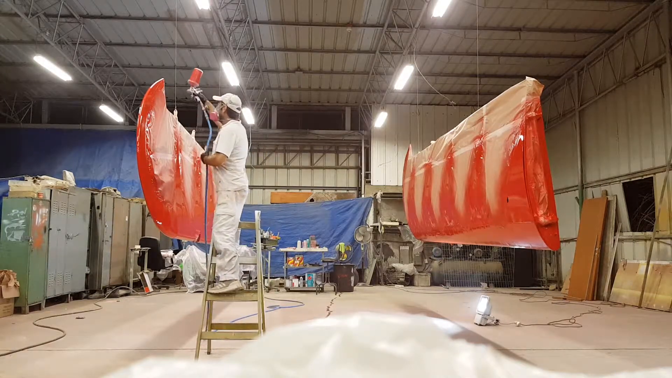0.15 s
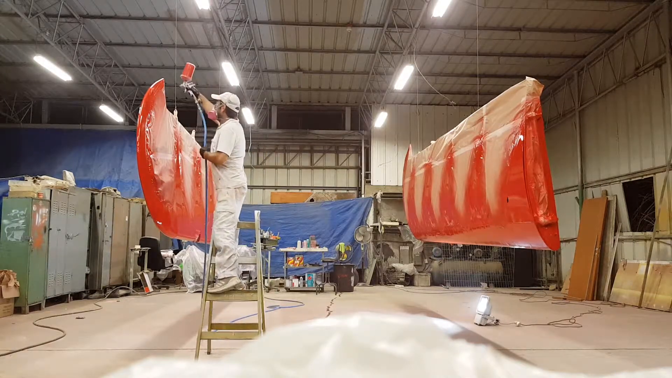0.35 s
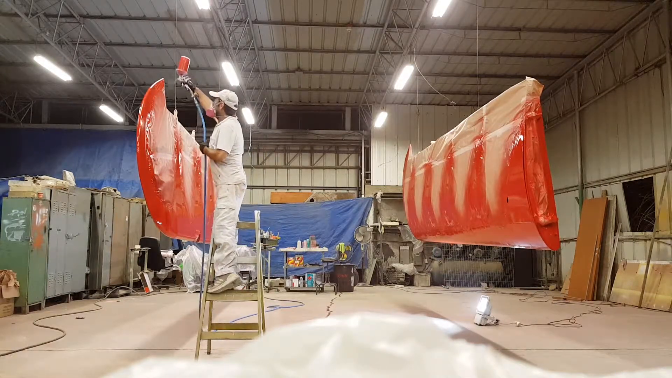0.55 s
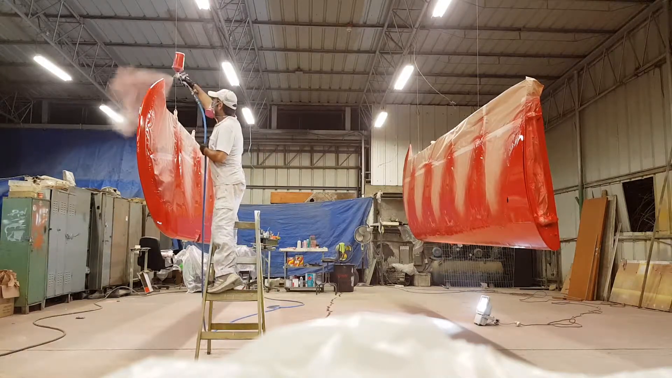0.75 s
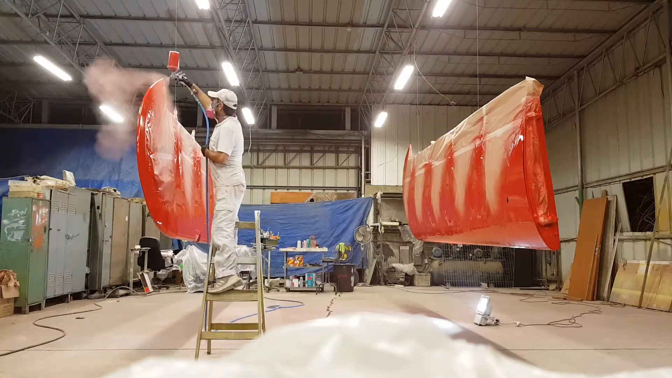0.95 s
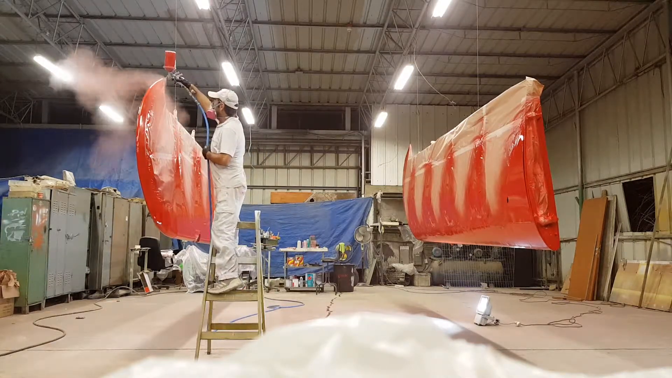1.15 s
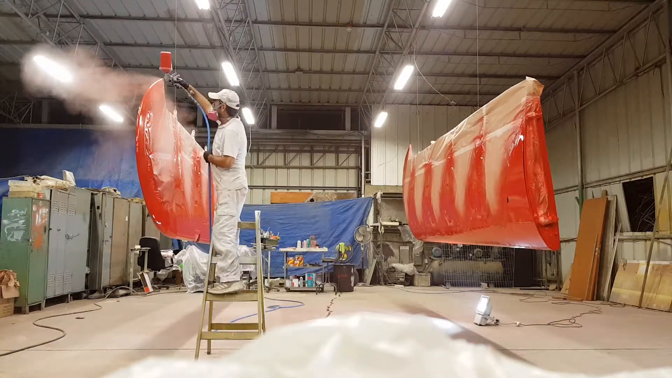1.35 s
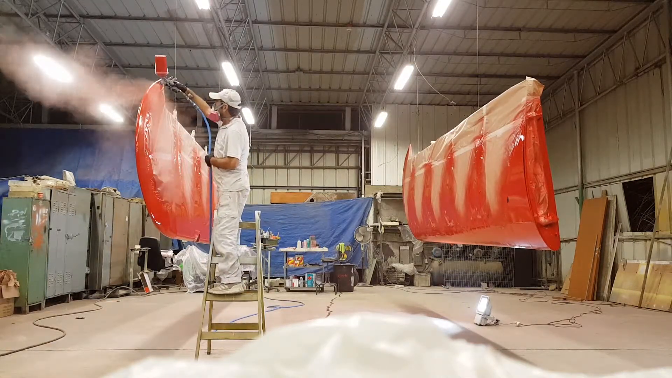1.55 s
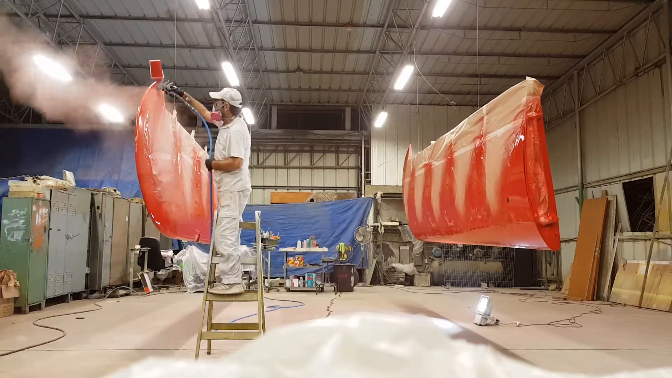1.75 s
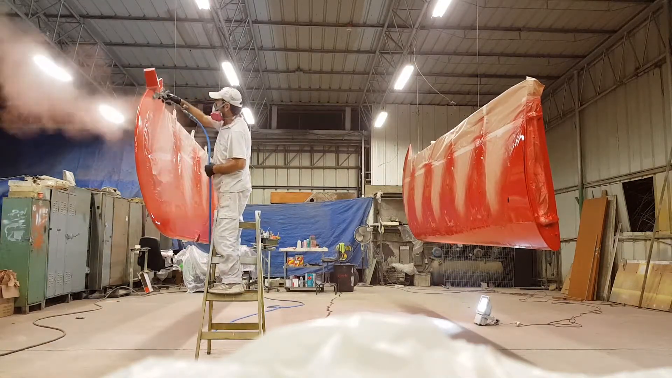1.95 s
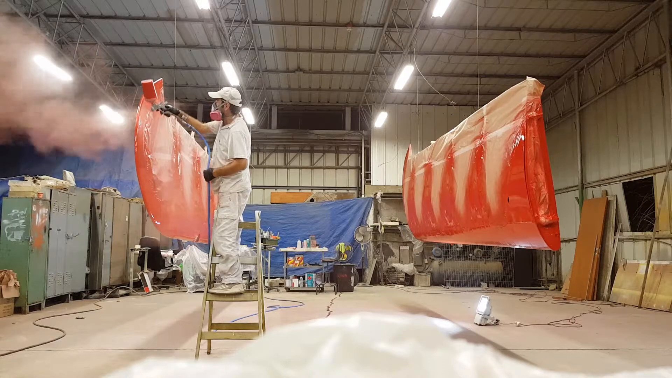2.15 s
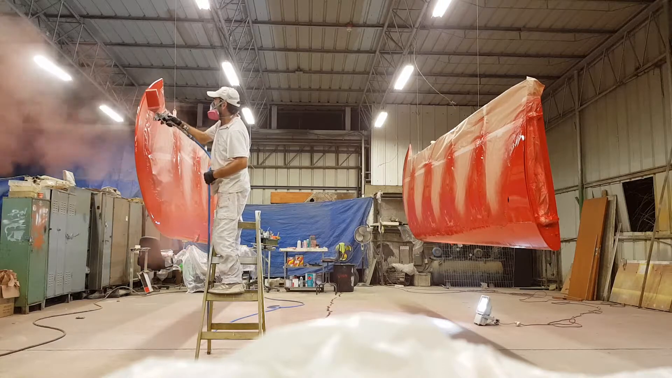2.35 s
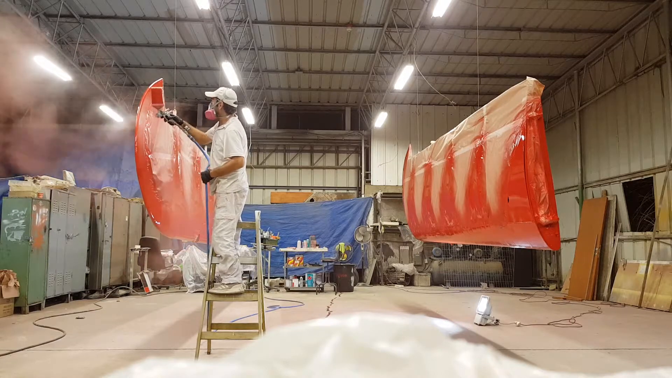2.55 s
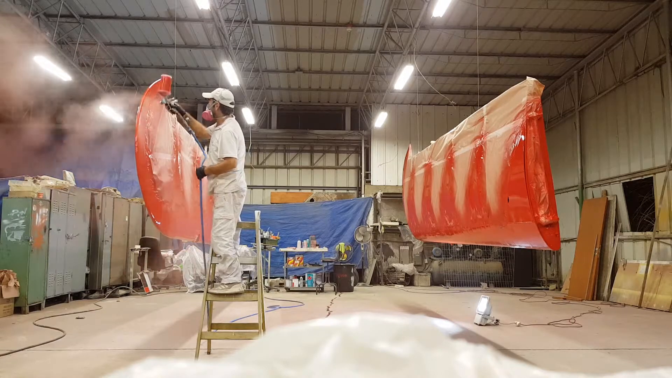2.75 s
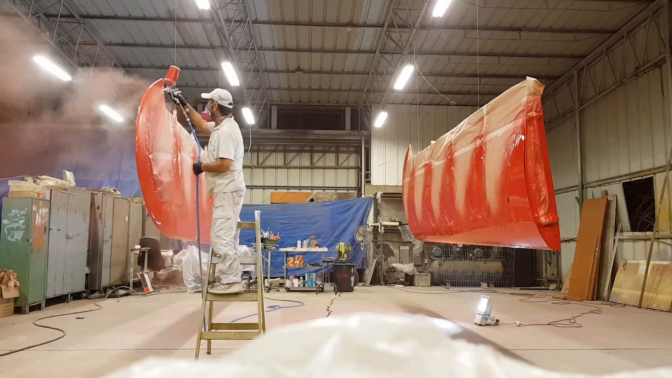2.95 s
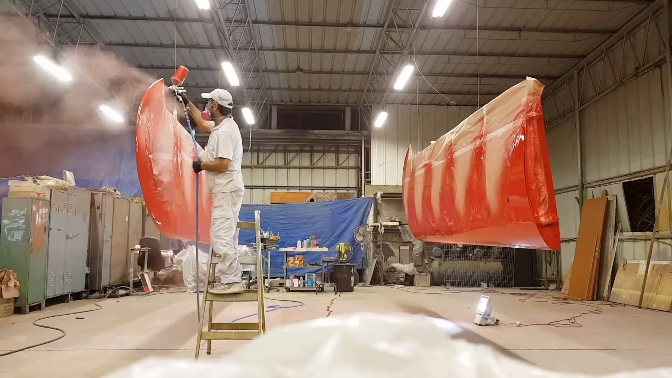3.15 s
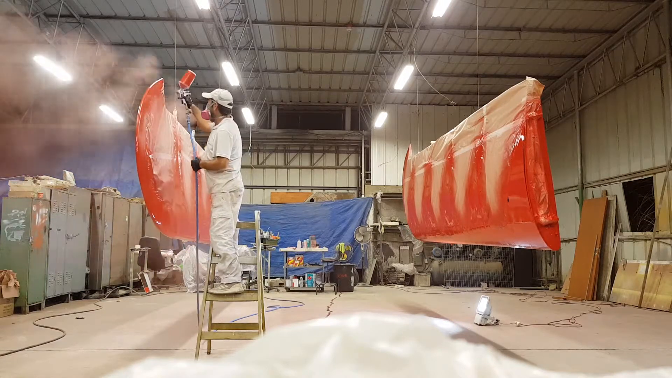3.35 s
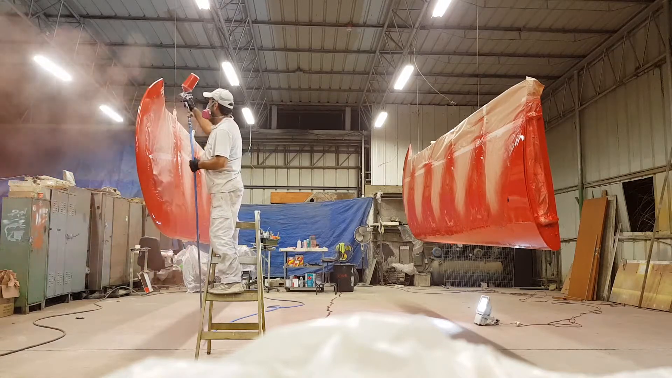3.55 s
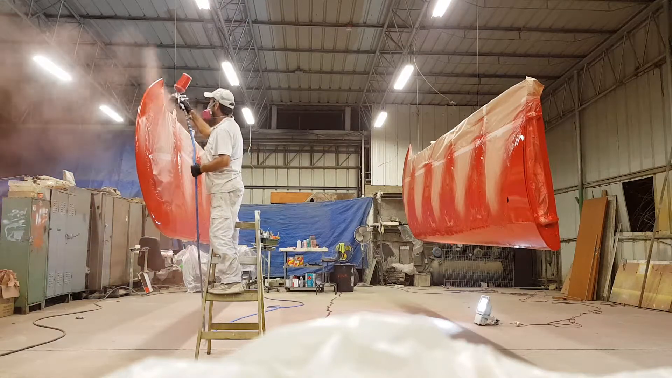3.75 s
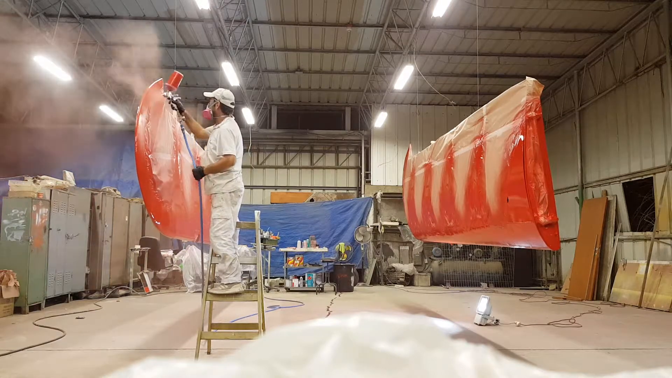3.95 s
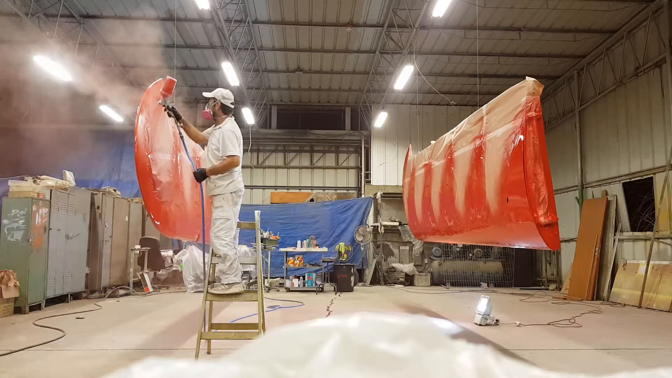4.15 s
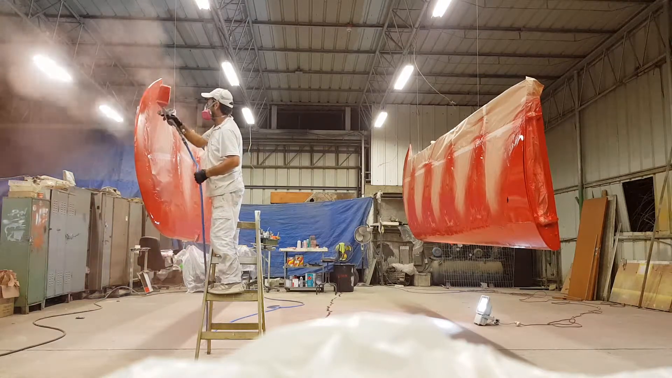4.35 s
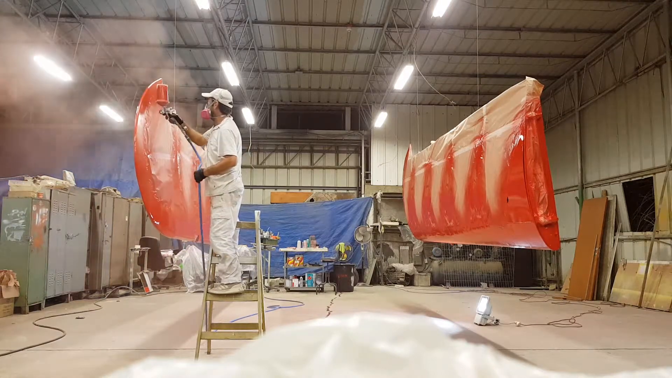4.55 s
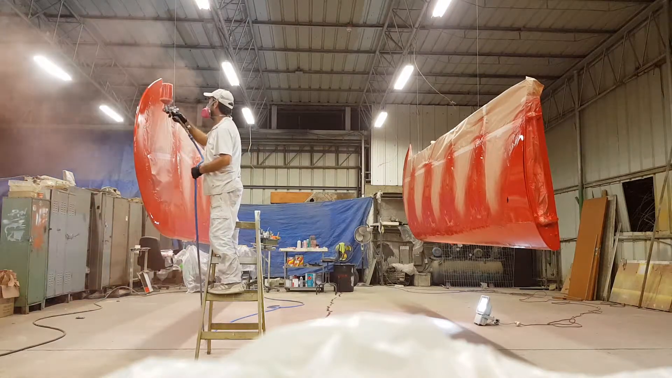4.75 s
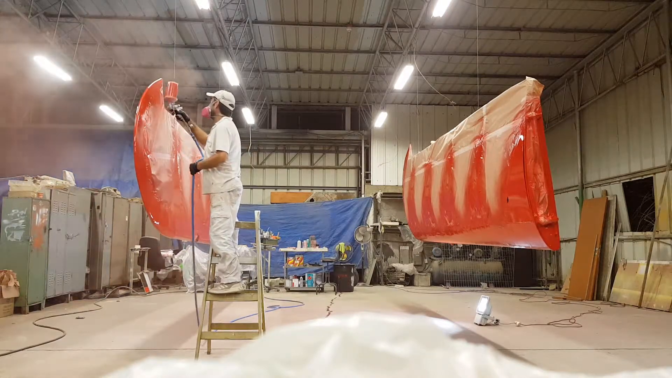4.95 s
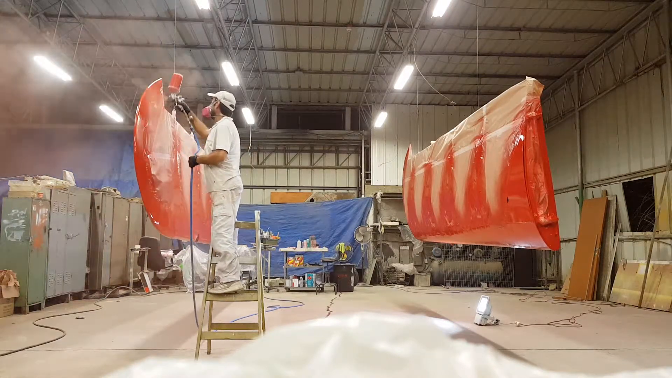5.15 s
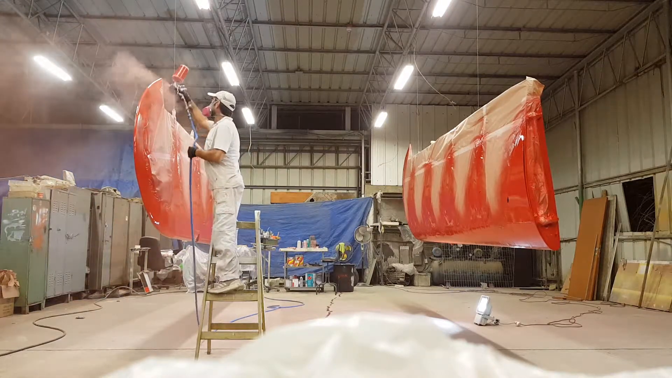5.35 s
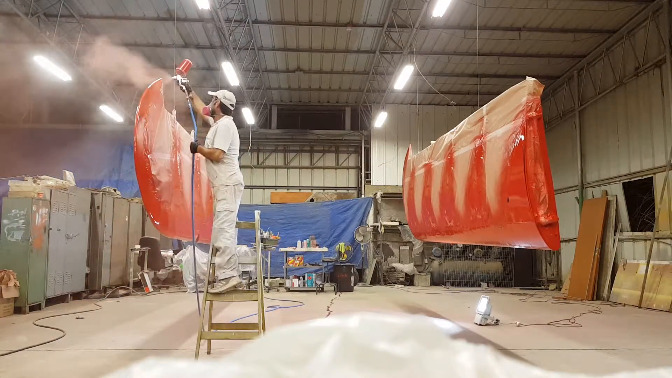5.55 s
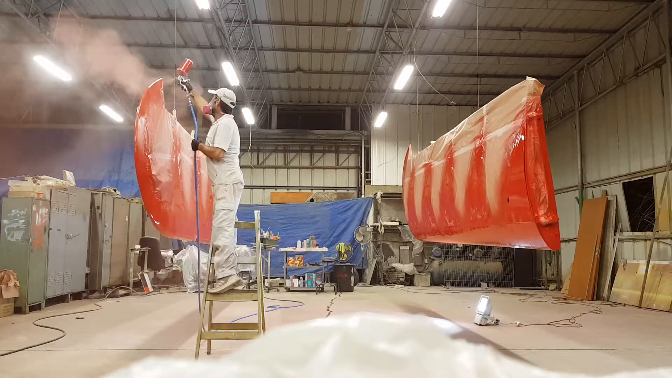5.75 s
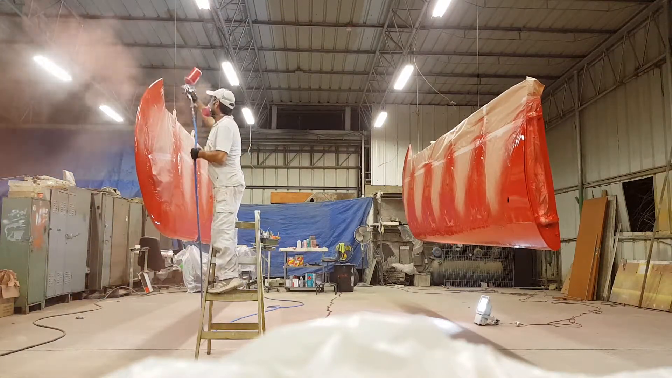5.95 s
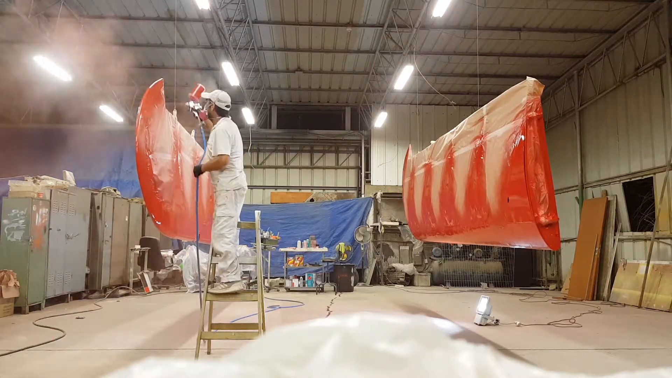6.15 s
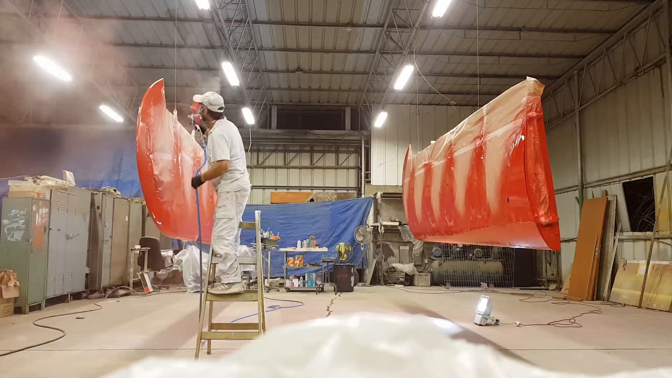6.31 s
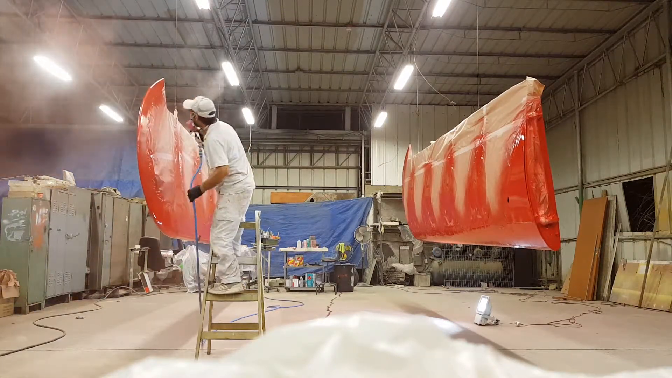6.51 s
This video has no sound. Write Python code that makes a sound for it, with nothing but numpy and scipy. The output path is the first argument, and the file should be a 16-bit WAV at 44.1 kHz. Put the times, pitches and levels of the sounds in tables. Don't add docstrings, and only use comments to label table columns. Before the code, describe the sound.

Inside a large hangar, a faint motor hum and soft ventilation wash run throughout. A trigger clacks, a thin bright air hiss starts, and paint dulls it into a fuller spray with a low roar in a hollow panel. Four passes alternate with sharper air-only spells. Soft ladder knocks sit underneath; release leaves a short hall ring. Stereo microphone some metres away.

```python
import sys
import numpy as np
from scipy import signal
from scipy.fft import rfft, irfft, next_fast_len
from scipy.io import wavfile
from scipy.ndimage import uniform_filter1d

SR = 44100
rng = np.random.default_rng(int(sys.argv[2]) if len(sys.argv) > 2 else 0)


def linear_from_db(decibels):
    return 10 ** (np.asarray(decibels, float) / 20)


def pcm_store(signal):
    levels = np.round(np.clip(np.atleast_2d(signal), -1, 1) * 32767)
    wavfile.write(sys.argv[1], SR, levels.astype(np.int16).T)


N = 294588
SIZE, HOP = 512, 128
HZ = np.fft.rfftfreq(SIZE, 1 / SR)[:, None]
T = np.arange(N // HOP + 5) * HOP / SR


def gun():
    power = jet() * linear_from_db(5.5)
    port_lag_s, likeness = 0.00015, 0.85
    lag = np.exp(-2j * np.pi * HZ * port_lag_s)
    direct = noise(power, likeness, lag) * valve(np.arange(N) / SR)
    return early(direct) + hall(power * valve(T - 0.012) ** 2)


def valve(t):
    open_s, shut_s = 0.538, 5.858
    opening_s, closing_s = 0.015, 0.0089
    opened = np.clip((t - open_s) / opening_s, 0, 1) ** 2
    return opened * np.exp(-np.maximum(t - shut_s, 0) / closing_s)


# frequency [Hz], density [dB per Hz].
FIZZ = [(2500, -32), (4000, -9), (6000, -11), (7500, -5.5), (10000, 0.5), (12000, 2), (13500, 3),
        (14900, 0.5)]
# frequency [Hz], density [dB per Hz].
BODY = [(300, -37), (1000, -25), (2000, 0), (2800, 1.5), (3500, 0.5), (4300, -4), (6000, -3.5), (9000, 1.5),
        (14900, -4)]
# frequency [Hz], density [dB per Hz].
ROAR = [(150, 4), (400, -19), (800, 3.5), (1150, 4.5), (1450, 5.5), (2200, -0.5), (3500, -17), (6000, -40)]
# centre [Hz], width [Hz], gain [dB].
RESONANCES = [(4730, 310, 5), (6000, 1080, 5.5), (8015, 590, 5.5), (13750, 1100, 1.5)]


def jet(patchy_db=0.5, flicker_db=0.43):
    fizz_db, body_db, roar_db, tilt_db = needle()
    resonance_db = sum(db / (1 + (2 * (HZ - hz) / width) ** 2) for hz, width, db in RESONANCES)
    tilted_db = tilt_db * np.log2((HZ + 1) / 11000)
    fizz = linear_from_db(2 * fizz_db) * density(read(FIZZ, HZ) + resonance_db + tilted_db)
    body = linear_from_db(2 * body_db) * density(read(BODY, HZ) + resonance_db)
    roar = linear_from_db(2 * roar_db + 9.5) * density(read(ROAR, HZ))
    power = fizz + body + roar + hollow()
    grain = rng.standard_normal((len(T), len(HZ)))
    patches = uniform_filter1d(uniform_filter1d(grain, size=24, axis=0), size=8, axis=1).T
    flicker = uniform_filter1d(rng.standard_normal(len(T)), size=30)
    gusts = np.clip(HZ / 6000, 0, 1) * flicker / flicker.std()
    return power * linear_from_db(2 * (patchy_db * patches / patches.std() + flicker_db * gusts))


# paint stops [s], paint returns [s],
# fizz at start [dB], fizz at end [dB], last spurt [dB].
DRY_SPELLS = [
    (0.508, 0.603, -17, -19.5, -0.5),
    (2.227, 2.537, -18, -18, -0.5),
    (3.31, 3.64, -20.5, -19.5, 1.5),
    (4.242, 5.136, -19, -17, 1.5),
    (5.758, 5.86, -24.5, -19.5, 0.5),
]
# fizz at start [dB], fizz at end [dB], roar at start [dB], roar at end [dB].
PASSES = [
    (-27, -24, -48.5, -48.5),
    (-23.5, -26.5, -48, -47.5),
    (-24.5, -24, -46.5, -51.5),
    (-24.5, -26, -50, -54),
]


def needle():
    clears_s, fills_s, spurt_s = 0.06, 0.072, 0.072
    roar_lag_s, roar_fades_s, roar_grows_s = 0.04, 0.14, 0.095
    wet_body_db, dry_body_db, wet_tilt_db, dry_tilt_db, dry_roar_db = -32, -33.5, -1.5, 1.0, -54
    stops, returns, first_db, last_db, spurt_db = np.transpose(DRY_SPELLS)
    dry = sum(plateau(T, a, b, clears_s, fills_s) for a, b in zip(stops, returns))
    quiet = sum(plateau(T, a, b + roar_lag_s, roar_fades_s, roar_grows_s) for a, b in zip(stops, returns))
    spurt = sum(db * np.exp(-((T - s) / spurt_s + 0.5) ** 2) for s, db in zip(returns, spurt_db))
    dry_times = np.ravel([stops, returns], "F")
    dry_db = np.interp(T, dry_times, np.ravel([first_db, last_db], "F")) + spurt
    wet_times = np.ravel([returns[:-1], stops[1:]], "F")
    wet_db, roar_db = (np.interp(T, wet_times, pair.ravel()) for pair in np.hsplit(np.array(PASSES), 2))
    fizz_db = wet_db + dry * (dry_db - wet_db)
    body_db = wet_body_db + dry * (dry_body_db - wet_body_db)
    roar_db = roar_db + quiet * (dry_roar_db - roar_db)
    tilt_db = wet_tilt_db + dry * (dry_tilt_db - wet_tilt_db) + 1.4 * spurt
    return fizz_db, body_db, roar_db, tilt_db


# start [s], end [s], level [dB], from [Hz], to [Hz].
SWEEPS = [
    (.66, 0.776, -38.5, 1560, 1560),
    (.78, 2.22, -47.5, 1560, 1580),
    (2.66, 3.1, -47.5, 1630, 1600),
    (3.12, 3.38, -42, 1650, 1700),
    (3.705, 3.85, -41, 1750, 1640),
    (3.86, 4.03, -48, 1640, 1600),
    (4.017, 4.33, -38.5, 1600, 1720),
    (5.21, 5.4, -39, 1750, 1600),
    (5.4, 5.68, -37, 1580, 1540),
]


def hollow():
    edge_s, width_hz = 0.05, 95
    power = 0
    for start, end, db, from_hz, to_hz in SWEEPS:
        centre_hz = np.interp(T, [start, end], [from_hz, to_hz])
        peak = 1 / (1 + ((HZ - centre_hz) / width_hz) ** 2) ** 2
        gain = linear_from_db(2 * db - 12.5) * plateau(T + edge_s / 2, start, end, edge_s, edge_s)
        power = power + gain * peak / peak.sum(0)
    return power


# delay [ms], level [dB].
REFLECTIONS = [(1.3, -17), (2.1, -16), (3.4, -16), (4.7, -15), (7.7, -14), (9.2, -14), (11.5, -13),
               (16.4, -13), (19.1, -14), (22.6, -14)]


def early(x):
    taps = np.zeros((2, 1400))
    taps[:, 0] = 1
    for (ms, db), (side, sign) in zip(REFLECTIONS, rng.uniform(-1, 1, (len(REFLECTIONS), 2))):
        delays = np.round(ms * SR / 1000 + np.array([6, -6]) * side).astype(int)
        taps[[0, 1], delays] = np.sign(sign) * linear_from_db(db + 0.5)
    return signal.oaconvolve(x, taps / np.linalg.norm(taps[0]), axes=1)[:, :N]


# frequency [Hz], time to fall 60 dB [s].
HALL_T60 = [(300, 2), (1500, 0.43), (4000, 1), (8000, 0.82), (15000, 0.48)]
# frequency [Hz], level [dB].
ABSORBED = [(500, -4), (4000, 1.5), (9000, -1), (15000, -2)]


def hall(power):
    keep = linear_from_db(-120 * HOP / SR / read(HALL_T60, HZ[:, 0]))
    late = np.array([signal.lfilter([1 - k], [1, -k], row) for k, row in zip(keep, power)])
    return diffuse(linear_from_db(2 * (1.5 + read(ABSORBED, HZ))) * late)


# time [s], peak [dB], centre [Hz].
TICKS = [
    (.417, -29.5, 10000),
    (0.433, -23.5, 2300),
    (0.464, -26, 2610),
]


def trigger():
    length = 6000
    out, t = np.zeros((2, N)), np.arange(length) / SR
    shape = (np.exp(-t / 0.0028) + 0.23 * np.exp(-t / 0.1)) * np.clip(t / 0.00084, 0, 1)
    for (s, db, hz), burst in zip(TICKS, rng.standard_normal((len(TICKS), 2, length))):
        octave = signal.butter(2, [hz / np.sqrt(2), hz * np.sqrt(2)], "band", fs=SR)
        colour = signal.lfilter(*octave, burst)
        first = round(s * SR)
        out[:, first:first + length] += linear_from_db(db - 8.5) * colour / colour.std() * shape
    return out


# time [s], length [s], level [dB].
SHIFTS = [
    (.98, .15, -39),
    (1.23, .15, -42),
    (1.7, .5, -47),
    (2.92, 0.21, -42),
    (3.3, 0.31, -39.5),
    (3.95, 0.22, -38.5),
    (4.34, 0.14, -41.5),
    (4.72, .27, -44),
    (5.42, .35, -42),
    (6.45, 0.17, -47),
]


def ladder():
    t, (middle, side) = np.arange(N) / SR, rng.standard_normal((2, N))
    low = signal.butter(1, [140, 450], "band", fs=SR, output="sos")
    knock = signal.sosfilt(low, [middle + 0.25 * side, middle - 0.25 * side])
    return linear_from_db(-7.0) * swells(SHIFTS, -51, t) * knock / knock.std()


# multiple of the shaft rate, level midway [dB rms],
# gain as the load shifts [dB per s].
HARMONICS = [(2, -53, 0.1), (3, -58, -0.3), (4, -55.5, 1.3), (5, -63.5, -1.5), (6, -63.5, 0.4),
             (7, -61, -1.1), (8, -59.5, -2), (9, -62, -.1), (11, -63, .3)]


def motor(wander_db=1.27):
    shaft_hz, fan_hz = 66.2, 99.7
    t = np.arange(N) / SR
    coarse = t[::441]
    wander = np.interp(t, coarse, drift(1, 8.0, coarse)[0])
    turns = np.cumsum(shaft_hz * (1 + 0.0015 * wander)) / SR
    out = linear_from_db(-60) * np.sqrt(2) * np.sin(2 * np.pi * fan_hz * t) * np.ones((2, 1))
    out += linear_from_db(1.0) * surges(t) * np.sin(2 * np.pi * turns)
    for (k, db, db_per_s), swell in zip(HARMONICS, drift(len(HARMONICS), 6.0, coarse)):
        off_side = np.array([[0.05], [-0.05]]) * k
        phase = 2 * np.pi * (k * turns + rng.random()) + off_side
        level_db = db + db_per_s * (coarse - t[-1] / 2) + wander_db * swell
        out += linear_from_db(np.interp(t, coarse, level_db)) * np.sqrt(2) * np.sin(phase)
    return out


def low_air():
    band = signal.butter(2, [35, 110], "band", fs=SR, output="sos")
    rumble = signal.sosfilt(band, rng.standard_normal(N))
    return linear_from_db(-6.0) * surges(np.arange(N) / SR) * rumble / rumble.std()


# time [s], length [s], level [dB].
SURGES = [(.04, .2, -53), (.85, .12, -57), (1.35, .3, -55), (1.75, .35, -53), (2.25, 0.45, -52),
          (3.55, 0.29, -53), (3.93, 0.17, -53), (4.15, .2, -53), (4.7, 0.5, -52), (5.05, .25, -50),
          (5.82, .25, -55), (6.15, .3, -56), (6.65, 0.28, -52)]


def surges(t):
    return swells(SURGES, -59.5, t)


# frequency [Hz], density [dB per Hz].
WASH = [(25, -14), (130, -9), (300, -9.5), (600, -5.5), (1300, -10), (2100, -7), (3700, -10), (5200, -20),
        (6800, -23.5), (8000, -21), (9200, -24), (12000, -25), (15800, -28.5)]


def ventilation():
    steady = diffuse(linear_from_db(2 * -37.5) * density(read(WASH, HZ) + 0 * T))
    return signal.sosfilt(signal.butter(4, 130, "high", fs=SR, output="sos"), steady)


# frequency [Hz], left-right likeness [-1 to 1].
LIKENESS = [(60, .97), (130, .93), (260, .75), (500, .45), (800, .2), (1300, -.2), (2400, 0), (15000, 0)]


def diffuse(power):
    return noise(power, read(LIKENESS, HZ))


def noise(power, same, turn=1):
    a, b, c, d = rng.standard_normal((len(T), len(HZ), 4)).T
    same, left = np.clip(same, -1, 1), a + 1j * b
    right = turn * (same * left + np.sqrt(1 - same ** 2) * (c + 1j * d))
    z = np.array([left, right]) * np.sqrt(power) * 0.82
    return signal.istft(z, nperseg=SIZE, noverlap=SIZE - HOP)[1][:, :N]


def read(points, hz):
    f, value = np.transpose(points)
    return np.interp(np.log(hz + 1), np.log(f + 1), value)


def density(shape_db):
    power = linear_from_db(2 * shape_db)
    return power / power.sum(0)


def drift(count, top_hz, t):
    f = np.geomspace(top_hz / 30, top_hz, 16)[:, None]
    waves = []
    for p in rng.random((count, 16)):
        waves.append((np.sin(2 * np.pi * (f * t + p[:, None])) / np.sqrt(f)).sum(0))
    return np.array(waves) / np.sqrt((0.5 / f).sum())


def plateau(t, start, end, rise, fall):
    u = np.clip(np.minimum((t - start) / rise, 1 - (t - end) / fall), 0, 1)
    return u * u * (3 - 2 * u)


def swells(rows, rest_db, t):
    bells = sum(linear_from_db(2 * db) * np.exp(-(2 * (t - s) / length) ** 2) for s, length, db in rows)
    return np.sqrt(linear_from_db(2 * rest_db) + bells)


def scene():
    return gun() + trigger() + ladder() + motor() + low_air() + ventilation()


def low_pass(x):
    return signal.sosfilt(signal.butter(12, 17080, fs=SR, output="sos"), x)


# frequency [Hz], left over right [dB].
PORT_TILT = [(60, 1.5), (1500, 1.5), (2800, -0.5), (4100, -0.5), (6400, -1.5), (8700, 5.5), (11000, 2),
             (13500, -1), (15500, -0.5)]


def record(dry):
    size, edge_hz = next_fast_len(N), 15770
    hz = np.fft.rfftfreq(size, 1 / SR)
    ports = linear_from_db(read(PORT_TILT, hz) * np.array([[0.5], [-0.5]]))
    band = np.clip((edge_hz - hz) / 20, 0, 1)
    mix = irfft(rfft(dry, size) * ports * band, size)[:, :N]
    return low_pass(mix)


dry = scene()
out = record(dry)
pcm_store(out)
```